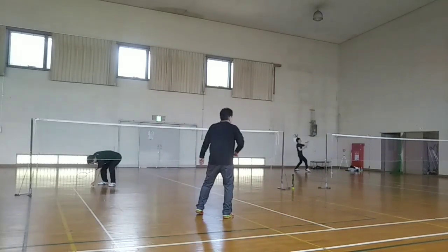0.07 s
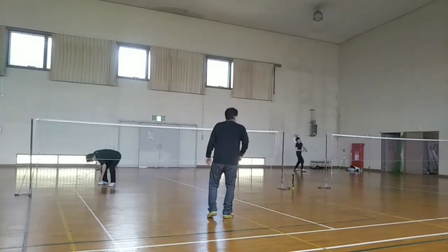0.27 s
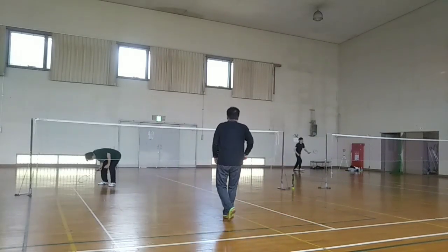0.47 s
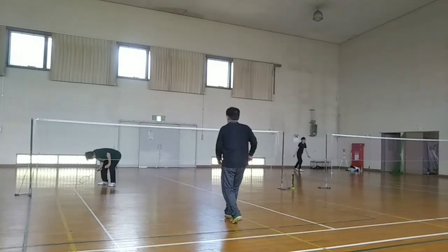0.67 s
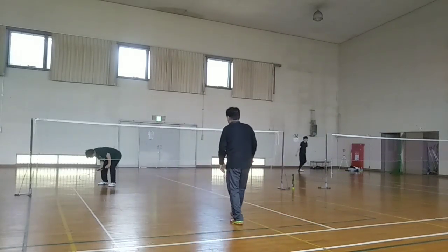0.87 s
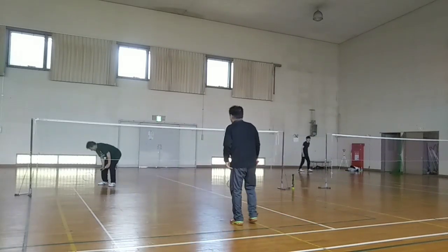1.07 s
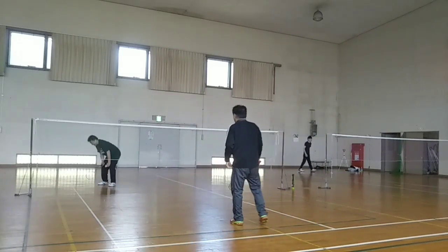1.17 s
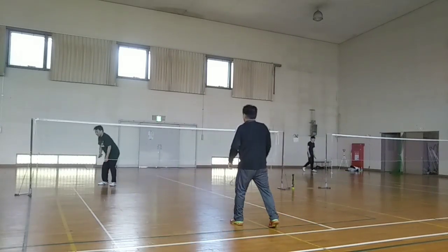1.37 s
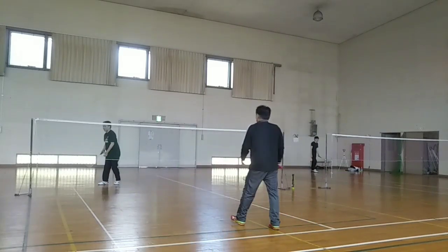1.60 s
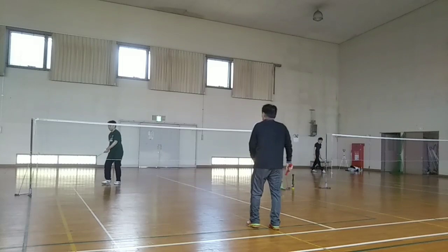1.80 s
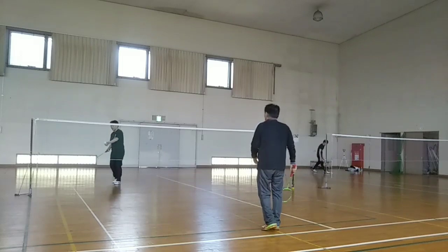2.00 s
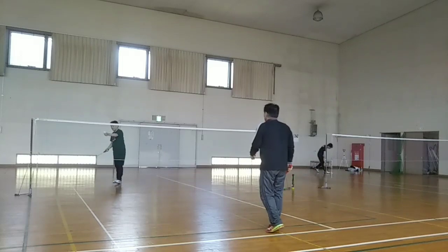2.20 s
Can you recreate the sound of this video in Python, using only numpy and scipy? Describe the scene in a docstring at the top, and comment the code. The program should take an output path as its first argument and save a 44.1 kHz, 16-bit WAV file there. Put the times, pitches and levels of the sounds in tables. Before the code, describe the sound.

One sharp racket hit on a shuttlecock rings through a large sports hall, heard from some way off; after the tail fades, soft footsteps, scuffs and a rattling knock on the wooden floor follow.

```python
"""Low rumble, soft hiss and a few soft footfalls open the scene in a large sports hall. Then a racket strikes
a shuttlecock some way off: cork, strings and a sharp contact, echoes from nearby and a long tail.
Later something hard knocks the wooden floor and rattles, among scuffs, more footfalls and faint ticks.
Struck things are sums of fading sine waves plus short clicks; the rest is filtered noise. The hall is noise
that fades at its own speed in each pitch range. The microphone passes little treble."""
import sys
import numpy as np
from scipy import signal
from scipy.fft import rfft, irfft, next_fast_len
from scipy.io import wavfile
from scipy.ndimage import map_coordinates

SR = 44100
rng = np.random.default_rng(int(sys.argv[2]) if len(sys.argv) > 2 else 0)


def gain_from_db(level_db):
    """Convert decibel levels to linear amplitude factors (20 dB per decade)."""
    decades = np.asarray(level_db, float) / 20
    return 10 ** decades


def master(y):
    """Save y as 16-bit WAV."""
    cut = np.clip(np.atleast_2d(y).T, -1, 1)
    pcm = np.round(cut * 32767)  # scale
    wavfile.write(sys.argv[1], SR, pcm.astype(np.int16))


N = 99225  # length of the scene in samples
SCENE_T = np.arange(N) / SR  # time through the scene, s
EVENT_T = np.arange(SR // 2) / SR  # time after the start of one short event, s

# All levels are relative. A t60/s is the time to fade by 60 dB.
# Tone of the hiss: f/Hz, level/dB
HISS_TONE = [(71, -33), (120, 9), (315, -9), (425, -21.5), (1010, -11.5), (1310, -16.5), (1860, -13),
             (6260, -27.5), (8000, -34), (10400, -80), (17600, -120)]
# Loudness of the rumble over time: t/s, level/dB
RUMBLE_LEVEL = [(0.0, -46.5), (0.09, -44.5), (0.21, -53), (0.37, -56), (0.75, -54), (1.35, -62.5),
                (1.95, -49.5), (2.25, -56.5)]
# Tone of the rumble: f/Hz, level/dB
RUMBLE_TONE = [(15, -51), (28, -19.5), (38, 6.5), (60, 2), (100, -2.5), (180, -14), (300, -45),
               (600, -50.5)]
# Loudness of the distant activity over time: t/s, level/dB
BUSTLE_LEVEL = [(0, -57.5), (.2, -59), (1.3, -69.5), (1.62, -60), (1.8, -61), (1.93, -54), (2.25, -66)]
# Tone of the distant activity: f/Hz, level/dB
BUSTLE_TONE = [(100, -45), (250, 2), (600, 3.5), (850, -2.5), (1550, -7), (2500, -17.5), (3500, -20.5),
               (6500, -26.5), (8500, -38)]
# How long the hall's tail rings at each pitch: f/Hz, t60/s
HALL_DECAY = [(100, 0.63), (250, 1), (500, 1.38), (1000, 1.654), (2000, 1.786), (4000, 1.7), (6000, 1.21),
              (8000, 0.91)]
# Footfalls: t/s, level/dB, sole slap against thud level/dB
FOOTFALLS = [(0.059, -33, -5), (0.095, -42, -24.5), (1.352, -45, -9), (1.437, -47, 1), (1.529, -46, -8),
             (1.556, -44, -2.5), (1.599, -43.5, -1), (1.637, -45.5, 0), (1.751, -44.5, -11)]
# Ringing of the sprung floor under a foot: f/Hz, level/dB, t60/s
FLOOR_THUD = [(75.4, -12.5, 0.23), (131.3, 1.5, 0.043), (194.3, -1.5, 0.042), (291.3, -7.5, 0.074)]
# Ringing of the slapping sole: f/Hz, level/dB, t60/s
SOLE_SLAP = [(536, -10, 0.013), (919, -6.5, 0.027)]
# Brief rubs on the boards: centre t/s, half length/s, f/Hz, level/dB
SCUFFS = [(1.628, 0.029, 800, -61.5), (1.653, 0.029, 130, -51), (1.855, 0.014, 785, -51),
          (1.887, 0.013, 916, -52), (1.892, 0.0052, 3560, -62), (1.939, 0.021, 1530, -54)]
# Knocks on the floor: t/s, level/dB, extra level of the hard edge/dB
KNOCKS = [(1.7738, -20, -5), (1.7917, -41, 10.5), (1.797, -28.5, -6), (1.8078, -46, -15),
          (1.8369, -30, -1.5), (1.8572, -39, 2.5)]
# Ringing of the knocked boards: f/Hz, level/dB, t60/s
BOARDS = [(120, -7, 0.033), (256, -0.5, 0.025), (424, 7.5, 0.012), (800, -5.5, 0.026), (1048, -3.5, 0.022),
          (1530, 0.5, 0.0084)]
# Faint ticks: t/s, level/dB
TICKS = [(0.845, -49), (1.4379, -64.5)]
# Tone of the knocks' hard edge and of the ticks: f/Hz, level/dB
EDGE_TONE = [(1200, -2), (2000, 1), (3100, 8.5), (4300, -10), (5900, 6.5), (7500, -2)]
# Ringing of the racket's string bed: f/Hz, level/dB, t60/s
STRINGS = [(911, -15, 0.052), (1020.2, -8.5, 0.089), (1103, -10.5, 0.025), (1260, -13, 0.025),
           (1480, -12.5, 0.014)]
# Ringing of the shuttlecock's cork: f/Hz, level/dB, t60/s
CORK = [(270, -12.5, 0.021), (411.4, -12.5, 0.013)]
# Tone of the sharp contact: f/Hz, level/dB
CONTACT_TONE = [(60, -35), (180, 7), (400, 1), (620, -1.5), (900, 4.5), (1350, 1.5), (2000, 0.5),
                (3050, -4.5), (4000, -12.5), (5000, -9), (6400, -9), (8000, -18.5)]
# A small racket head sends out little bass: f/Hz, level/dB
RACKET_RADIATION = [(30, -50), (170, 0)]
# Direct path, then floor, walls and roof: t/s after the hit, level/dB
ECHOES = [(0, -12.5), (.0028, -13.5), (0.0127, -5), (.0163, -3), (.028, -9.5), (.031, -9.5), (.040, -7),
          (0.047, -13), (.096, -15), (.103, -20), (.128, -20), (.148, -13.5), (.205, -18)]
# What the microphone lets through: f/Hz, level/dB
MIC = [(20, -8.5), (40, 0), (6300, 2), (7000, -3), (7700, -3.5), (8100, -15), (8500, -66.5), (9500, -111.5)]


def unit(x):
    """Scale a sound to an average (rms) strength of 1."""
    return x / np.sqrt(np.mean(x ** 2) + 1e-20)


def along(points, hz):
    """Read a curve of (f/Hz, value) points, spaced as the ear hears pitch (log axis)."""
    f, value = np.transpose(points)
    return np.interp(np.log(hz + 1), np.log(f + 1), value)


def coloured(x, points):
    """Filter x to a curve of (f/Hz, level/dB) points, reacting as early as possible (minimum phase)."""
    size = 2 * next_fast_len(N)
    log_gain = along(points, np.fft.rfftfreq(size, 1 / SR)) * np.log(10) / 20
    # Folding the cepstrum forward in time gives the minimum phase.
    cepstrum = irfft(log_gain, size)
    cepstrum[1:size // 2] *= 2
    cepstrum[size // 2 + 1:] = 0
    response = np.exp(rfft(cepstrum))
    return irfft(rfft(x, size) * response, size)[:N]


def wobble(rate):
    """A smooth random curve with rate random points a second."""
    knots = rng.standard_normal(int(N * rate / SR) + 4)
    return map_coordinates(knots, [np.arange(N) * rate / SR])


def ring(modes):
    """One blow sets off several fading sine waves, each at a slightly new level."""
    total = np.zeros(len(EVENT_T))
    for hz, db, t60 in modes:
        varied_db = db + 1.5 * rng.standard_normal()
        total += gain_from_db(varied_db - 60 * EVENT_T / t60) * np.sin(2 * np.pi * hz * EVENT_T)
    return total


def noise_burst(t60):
    """Noise that starts at once and fades by 60 dB in t60 seconds."""
    return gain_from_db(-60 * EVENT_T / t60) * rng.standard_normal(len(EVENT_T))


def onset(rise_s):
    """A quick curved rise from 0 towards 1."""
    return 1 - np.exp(-EVENT_T / rise_s)


def add(track, s, x):
    """Mix x into the track at s seconds."""
    part = track[round(s * SR):][:len(x)]
    part += x[:len(part)]


def hall(x, wet_db, near_db):
    """Quick scatter from near surfaces and a long tail, fuller once the far walls join."""
    far_s, far_rise_s, before_db = 0.09, 0.008, -6  # far walls join; tail level before that
    near_t60 = 0.17  # s
    hz, t, bands = signal.stft(rng.standard_normal(N), SR, nperseg=256)
    # Each pitch range fades at its own speed.
    bands = bands * gain_from_db(-60 * t / along(HALL_DECAY, hz)[:, None])
    tail = signal.istft(bands, SR, nperseg=256)[1][:N]
    not_yet_far = 1 / (1 + np.exp(np.clip((SCENE_T - far_s) / far_rise_s, -50, 50)))
    fade_in = np.clip(SCENE_T / 0.0067, 0, 1)
    tail = tail * gain_from_db(before_db * not_yet_far) * fade_in
    near = gain_from_db(-60 * SCENE_T / near_t60) * rng.standard_normal(N)
    # Equal energy first, so that the two levels decide the balance.
    answer = gain_from_db(wet_db) * tail / np.linalg.norm(tail)
    answer += gain_from_db(near_db) * near / np.linalg.norm(near)
    return signal.fftconvolve(x, answer)[:N]


def rush(levels, tone, flicker_db, rate):
    """Filtered noise whose loudness follows (t/s, level/dB) points and wavers a little."""
    level_db = np.interp(SCENE_T, *np.transpose(levels)) + flicker_db * wobble(rate)
    return gain_from_db(level_db) * unit(coloured(rng.standard_normal(N), tone))


def hiss():
    """Noise around one level, wavering slightly."""
    return rush([(0, -62.5)], HISS_TONE, flicker_db=2.47, rate=11)


def rumble():
    """Low noise that slowly changes in loudness."""
    return rush(RUMBLE_LEVEL, RUMBLE_TONE, flicker_db=0.5, rate=9)


def bustle():
    """Distant activity: mid-pitched noise that swells and fades."""
    return rush(BUSTLE_LEVEL, BUSTLE_TONE, flicker_db=0.5, rate=12)


def footfalls():
    """Soft shoes make a sprung floor thud while the sole slaps it."""
    steps = np.zeros(N)
    for s, db, slap_db in FOOTFALLS:
        step = ring(FLOOR_THUD) + gain_from_db(slap_db) * ring(SOLE_SLAP)
        add(steps, s, gain_from_db(db) * onset(0.0018) * step)
    return steps + hall(steps, wet_db=-2.5, near_db=0)


def scuffs():
    """Rubs on the boards: short swells of noise, each passed through one resonance."""
    rubs = np.zeros(N)
    for s, half_s, hz, db in SCUFFS:
        resonance = signal.iirpeak(hz, 7.6, SR)  # 7.6 is the sharpness, Q
        band = signal.lfilter(*resonance, rng.standard_normal(N))
        swell = np.exp(-((SCENE_T - s) / half_s) ** 2)
        rubs += gain_from_db(db) * swell * unit(band)
    return rubs + hall(rubs, wet_db=-2.5, near_db=0)


def knocks():
    """A hard thing rings the boards and clicks as it rattles; a few faint ticks sound elsewhere."""
    click_t60 = 0.007  # s
    body, edge = np.zeros((2, N))
    for s, db, edge_db in KNOCKS:
        add(body, s, gain_from_db(db - 5) * onset(0.0012) * ring(BOARDS))
        add(edge, s, gain_from_db(db + edge_db - 6) * onset(0.00036) * noise_burst(click_t60))
    for s, db in TICKS:
        add(edge, s, gain_from_db(db) * noise_burst(2 * click_t60))
    edge = coloured(edge, EDGE_TONE)
    body_hall = hall(body, wet_db=-10, near_db=-4)
    edge_hall = hall(edge, wet_db=-5.5, near_db=-20)
    return body + edge + body_hall + edge_hall


def echo_paths():
    """Sound arrives along a few paths, each spread a little by rough surfaces."""
    paths = np.zeros(N)
    for s, db in ECHOES:
        smear = noise_burst(0.02)
        arrival = (EVENT_T == 0) + gain_from_db(10) * smear / np.linalg.norm(smear)
        add(paths, s, gain_from_db(db) * arrival)
    return paths


def racket():
    """The hit rings strings and cork with a sharp contact, heard along the echo paths and in the hall."""
    hit_s, hit_db, contact_db = 0.2377, -26, 23.5
    contact = coloured(np.arange(N) == 0, CONTACT_TONE)[:len(EVENT_T)]
    blow = ring(STRINGS) + ring(CORK) + gain_from_db(contact_db) * contact
    stroke = np.zeros(N)
    add(stroke, hit_s, gain_from_db(hit_db) * blow)
    stroke = coloured(stroke, RACKET_RADIATION)
    arrivals = signal.fftconvolve(stroke, echo_paths())[:N]
    return arrivals + hall(stroke, wet_db=8, near_db=4)


def scene():
    """Add all the sources together, as one channel."""
    background = hiss() + rumble() + bustle()
    return (background + footfalls() + scuffs() + knocks() + racket())[None]


def low_pass(x):
    """Removes everything above the highest recorded frequency."""
    return signal.sosfilt(signal.butter(12, 8400, fs=SR, output="sos"), x)


def record(dry):
    """The microphone path rolls off steeply in the treble."""
    mix = coloured(dry[0], MIC)[None]
    return low_pass(mix)


dry = scene()
out = record(dry)
master(out)
```